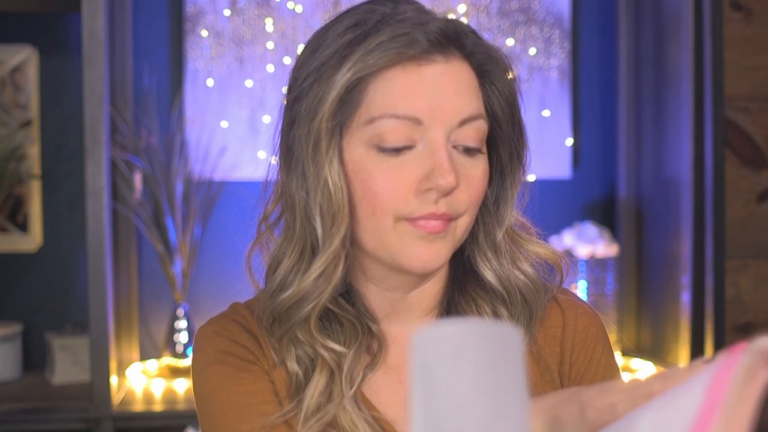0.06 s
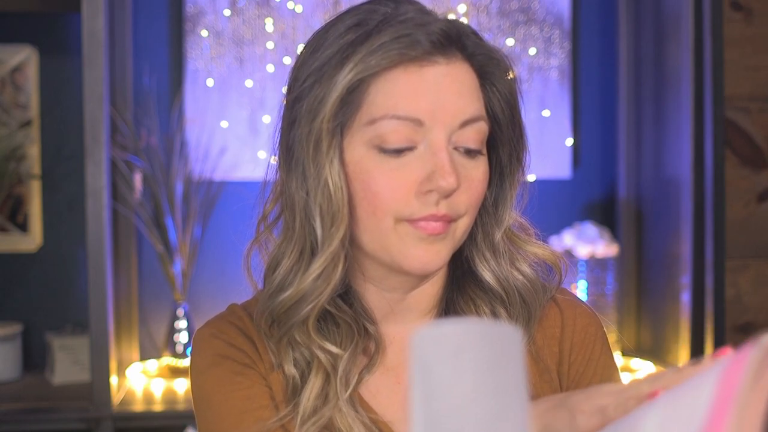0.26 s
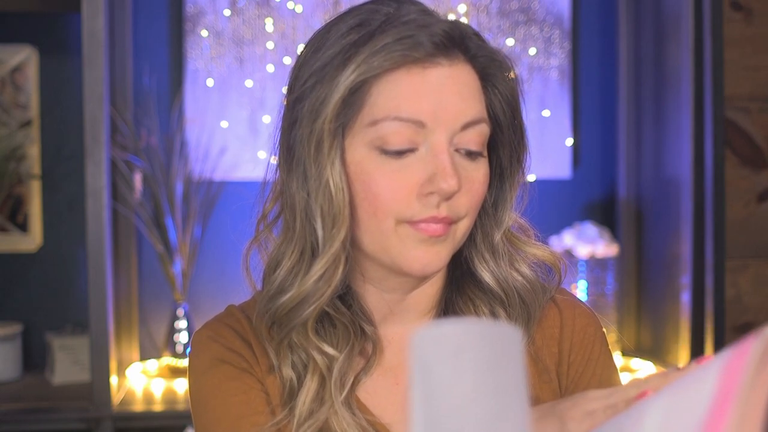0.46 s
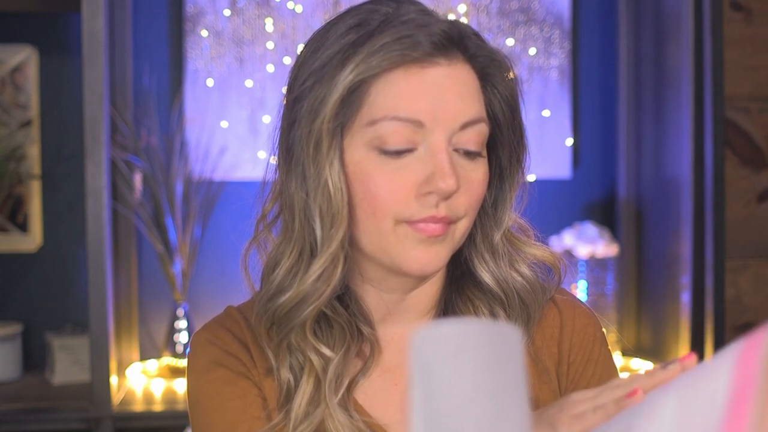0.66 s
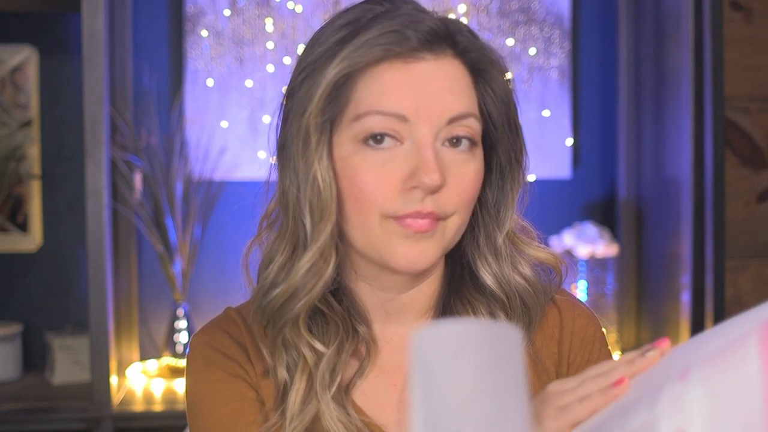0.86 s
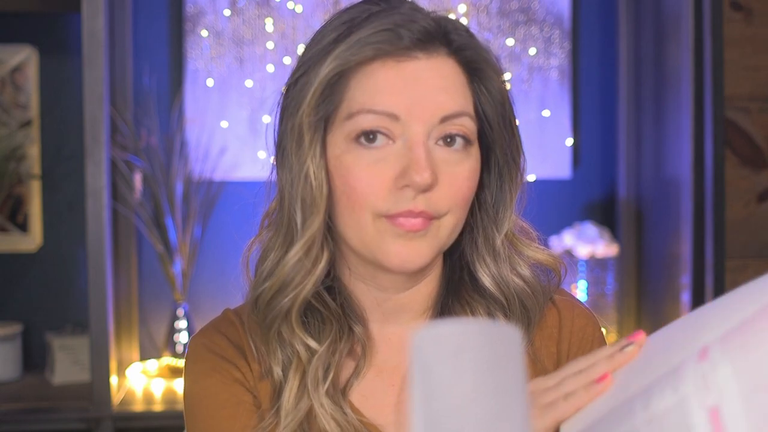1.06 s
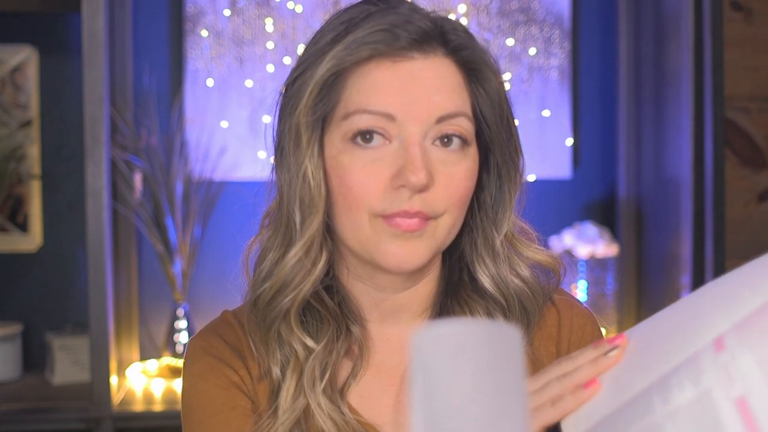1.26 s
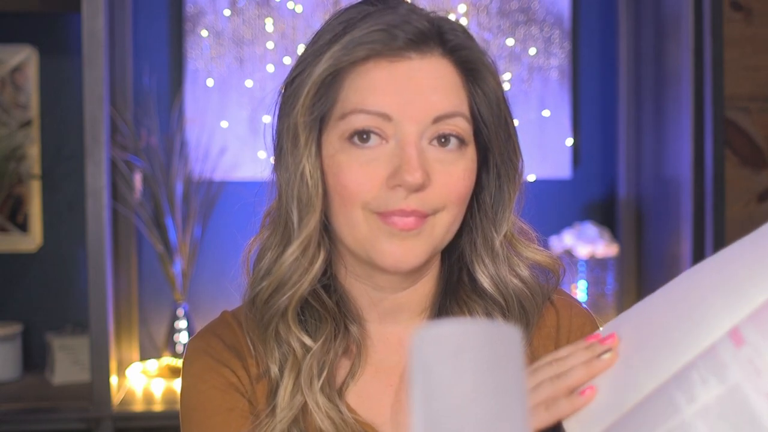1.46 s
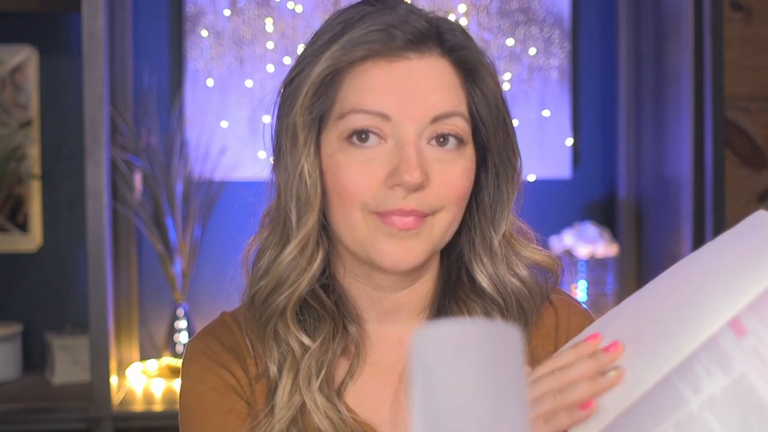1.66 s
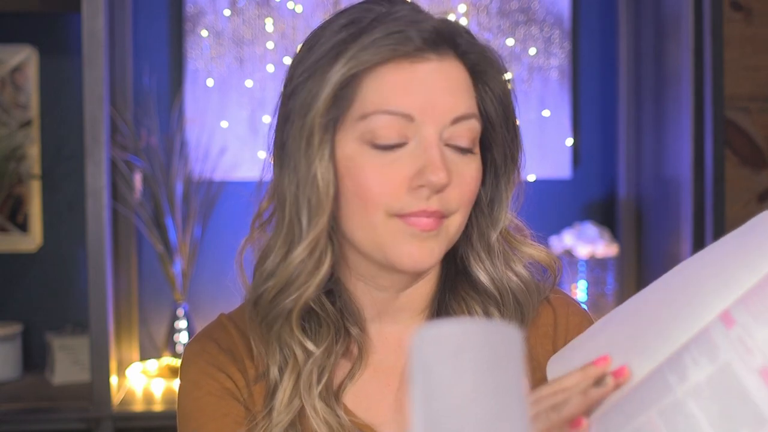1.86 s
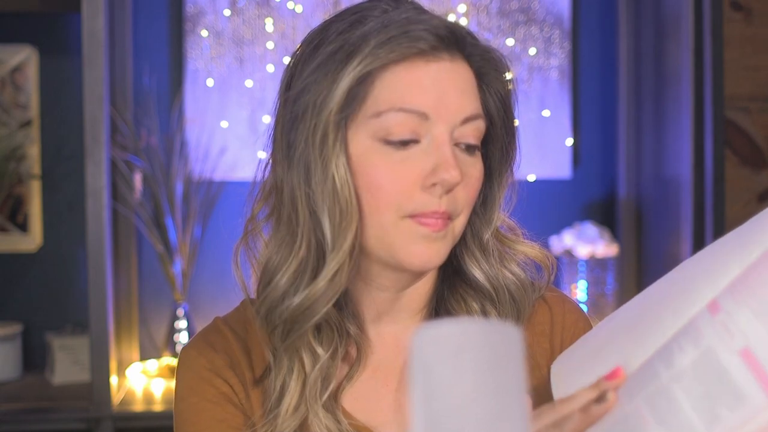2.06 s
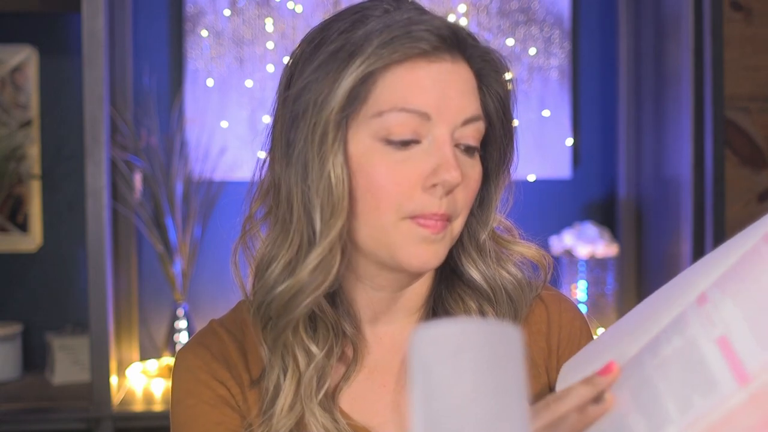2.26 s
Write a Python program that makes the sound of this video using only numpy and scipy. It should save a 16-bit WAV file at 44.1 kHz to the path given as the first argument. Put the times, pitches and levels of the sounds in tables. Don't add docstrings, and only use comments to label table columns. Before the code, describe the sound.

A hand rubs to and fro over thin book paper, a soft papery hiss swelling and fading

```python
import sys
import numpy as np
from scipy import signal
from scipy.fft import rfft, irfft
from scipy.io import wavfile

SR = 44100
rng = np.random.default_rng(int(sys.argv[2]) if len(sys.argv) > 2 else 0)


def convert_level_to_amplitude(level_db):
    exponent = np.asarray(level_db, float) / 20
    return 10 ** exponent


def persist_wave(psi):
    counts = np.round(np.clip(psi, -1, 1) * 32767).astype(np.int16)
    wavfile.write(sys.argv[1], SR, np.atleast_2d(counts).T)


N = 101518


def rms_one(x):
    return x / np.sqrt(np.mean(x ** 2) + 1e-20)


def at_hz(points, hz):
    point_hz, point_db = np.transpose(points)
    return np.interp(np.log(hz), np.log(point_hz), point_db)


def drift(rate_hz):
    r = np.exp(-80 * np.pi * rate_hz / SR)
    slow = signal.lfilter([1], [1, -2 * r, r * r], rng.standard_normal(N // 40 + 2002))[2000:]
    return np.interp(np.arange(N) / 40, np.arange(len(slow)), rms_one(slow))


def narrow(hz, width_hz):
    r = np.exp(-np.pi * width_hz / SR)
    poles = [1, -2 * r * np.cos(2 * np.pi * hz / SR), r * r]
    return rms_one(signal.lfilter([1, 0, -1], poles, rng.standard_normal(N + SR))[SR:])


def band_pass(x, order, low_hz, high_hz):
    return signal.sosfilt(signal.butter(order, [low_hz, high_hz], "band", fs=SR, output="sos"), x)


def bands(sources, low_hz, count):
    edges = low_hz * 2 ** (np.arange(40) / count)
    edges = edges[edges < .45 * SR]
    for k, (low, high) in enumerate(zip(edges, edges[1:])):
        yield np.sqrt(low * high), band_pass(sources[k % 2], 2, low, high)[-N:]


def rubbing():
    # (time [s], friction level [dB], brightness from palm to fingertips [0-1],
    # treble tilt as the hand shades the page [dB per octave])
    stroke = [(0.0, -42.5, 0.26, -2), (.55, -47.5, 0.14, 0), (0.628, -50.5, 0.06, -1), (.72, -66, 0.05, 2),
              (.77, -64, 0.34, -3), (.86, -52.5, 0.45, -3), (.98, -49.5, 0.94, -3.5),
              (1.328, -55.5, 0.62, -3.5), (1.438, -71.5, 1, -7), (1.49, -52.5, 1, -7),
              (1.7, -47.5, 0.98, -4), (1.81, -44.5, 1, -3), (1.845, -50, 1.1, -7), (1.9, -49, 1.1, -9),
              (1.925, -46, 1.1, -3), (2.02, -44, 0.8, -2.5), (2.1, -47, 1, -4.5), (2.3, -43.5, 0.74, -3.5)]
    # (frequency [Hz], level [dB per Hz])
    palm = [(600, -30), (900, -10.5), (1370, -13.5), (1900, -7.5), (4400, 1.5), (6000, -0.5), (11500, -5.5),
            (15600, -13)]
    fingers = [(600, -38), (1000, -20), (1650, -17.5), (2420, -9), (5700, -3.5), (8500, 0), (11500, 0.5),
               (15600, -8.5)]
    slips_per_s, slip_spread_db = 16000, 2
    patchy_db, judder_db = .5, .5
    shade_hz = 5770

    s, level_db, bright, treble_db = np.transpose(stroke)
    t = np.arange(N) / SR
    level_db = np.interp(t, s, level_db)
    bright = np.interp(t, s, np.clip(bright, -.5, 1.5))
    treble_db = np.interp(t, s, treble_db)

    size = (2, N + 2000)
    slips = (rng.random(size) < slips_per_s / SR) * rng.choice([-1, 1], size)
    slips = slips * convert_level_to_amplitude(slip_spread_db * np.minimum(rng.exponential(1, size), 4))

    hiss, power = 0, 0
    for hz, band in bands(slips / slips.std(), 620, count=7):
        colour_db = (1 - bright) * at_hz(palm, hz) + bright * at_hz(fingers, hz)
        gain = convert_level_to_amplitude(colour_db + treble_db * max(np.log2(hz / shade_hz), 0))
        hiss = hiss + gain * convert_level_to_amplitude(patchy_db * drift(3.83)) * band
        power = power + gain ** 2 * hz
    return convert_level_to_amplitude(level_db + judder_db * drift(25)) * rms_one(hiss / np.sqrt(power))


def rumble():
    level_db, fade_s = -71.5, 1
    low = band_pass(rng.standard_normal(N + SR), 2, 108, 292)[SR:]
    return convert_level_to_amplitude(level_db) * rms_one(low) * np.exp(-(np.arange(N) / SR / fade_s) ** 2)


def ticks():
    # (time [s], peak level [dB])
    buckles = [
        (.5107, -32),
        (0.514, -44),
    ]
    # (frequency [Hz], level [dB], decay by 60 dB [s])
    page = [(295, -19, 0.0099), (800, -20, 0.034), (1270, -17.5, 0.0054), (1900, -13.5, 0.0067),
            (2770, -7.5, 0.0034), (3300, -3, 0.0026), (4530, -4, .003)]
    clicks = np.zeros(N) + 1e-18
    for s, db in buckles:
        clicks[int(s * SR)] = convert_level_to_amplitude(db) * 3
    clicks = band_pass(clicks, 1, 250, 5500)
    out = 0
    for k, (hz, db, t60) in enumerate(page):
        r, w = convert_level_to_amplitude(-60 / (t60 * SR)), 2 * np.pi * hz / SR
        ring = signal.lfilter([0, np.sin(w)], [1, -2 * r * np.cos(w), r * r], clicks)
        out = out + (-1) ** k * convert_level_to_amplitude(db) * ring
    return out


def squeaks():
    # (start [s], length [s], pitch [Hz], level [dB])
    stalls = [
        (1.34, 0.21, 2950, -71.5),
    ]
    t = np.arange(N) / SR
    out = 0
    for s, length, hz, db in stalls:
        arch = np.sin(np.pi * np.clip((t - s) / length, 0, 1))
        swell = np.sqrt(np.clip(arch, 0, 1))
        tone = np.sqrt(2) * np.sin(2 * np.pi * hz * t) + 0.27 * narrow(hz, width_hz=25)
        out = out + convert_level_to_amplitude(db) * swell * tone
    return out


def room():
    # (frequency [Hz], level [dB per Hz])
    air_colour = [(28, -8), (50, -6), (100, -5), (250, -8), (800, -10), (1550, -19.5), (3500, -16.5),
                  (14000, -42)]
    # (frequency [Hz], width [Hz], level [dB])
    fan_tones = [(56.6, 13, -83.5), (69.5, 7.1, -64), (116.4, 10.5, -70), (143.1, 9.3, -70),
                 (179, 15, -73.5), (293.5, 12, -82.5), (406.5, 7.3, -79), (473.2, 0.67, -75.5),
                 (760, 5.9, -80)]
    air_db, fan_steady = -65, .3
    whine_hz, whine_db = 15466, -79
    t = np.arange(N) / SR
    noise = rng.standard_normal((2, N + SR))
    air = sum(convert_level_to_amplitude(at_hz(air_colour, hz)) * band for hz, band in bands(noise, 19, count=3))
    fan = 0
    for hz, width_hz, db in fan_tones:
        tone = narrow(hz, width_hz) + fan_steady * np.sin(2 * np.pi * hz * t)
        fan = fan + convert_level_to_amplitude(db) * rms_one(tone)
    whine = convert_level_to_amplitude(whine_db) * np.sqrt(2) * np.sin(2 * np.pi * whine_hz * t)
    return convert_level_to_amplitude(air_db) * rms_one(air) + fan + whine


def swapped(x):
    # (time [s], centre frequency [Hz])
    swaps = [(.067, 6250), (.067, 7650), (.277, 6250), (.277, 13100), (.487, 6250), (.487, 13800),
             (.487, 15100), (.533, 6000), (.533, 8300), (1.74, 12400), (1.764, 4650), (1.764, 10350),
             (2.159, 10350), (2.159, 13400)]
    swap_s, width_hz = .032, 1350
    t, hz = np.arange(N) / SR, np.fft.rfftfreq(N, 1 / SR)
    spectrum = rfft(x[0])
    out = x.copy()
    for s, centre_hz in swaps:
        band = irfft(spectrum * (np.abs(hz - centre_hz) < width_hz / 2), N)
        share = np.clip(2 * np.cos(np.pi * np.clip((t - s) / swap_s, -.5, .5)), 0, 1)
        other = np.array([np.roll(band, 600), np.roll(band, -600)])
        out += (np.sqrt(1 - share ** 2) - 1) * band + share * other
    return out


def scene():
    mono = rubbing() + rumble() + ticks() + squeaks() + room()
    return np.tile(mono, (2, 1))


def band_limit(x):
    return signal.sosfilt(signal.butter(12, 15710, fs=SR, output="sos"), x)


def record(dry):
    low_pass = signal.ellip(10, .2, 60, 15720, fs=SR, output="sos")
    mix = swapped(signal.sosfilt(low_pass, dry))
    return band_limit(mix)


dry = scene()
out = record(dry)
persist_wave(out)
```